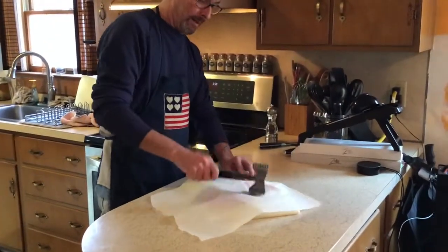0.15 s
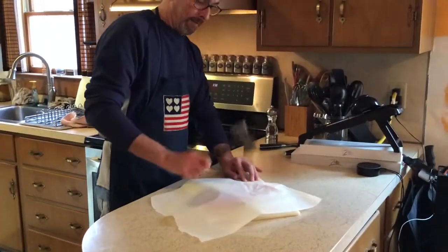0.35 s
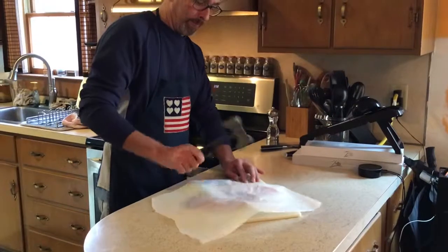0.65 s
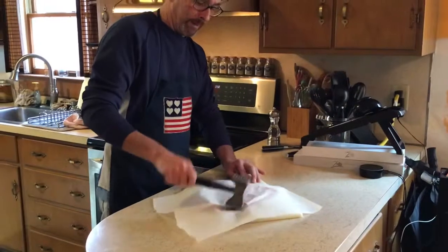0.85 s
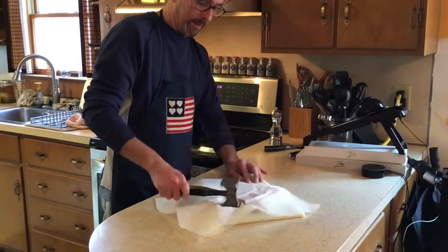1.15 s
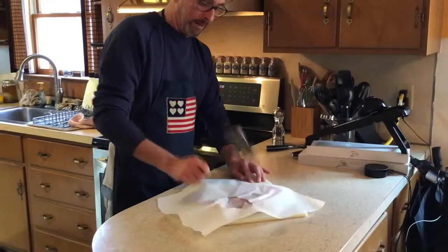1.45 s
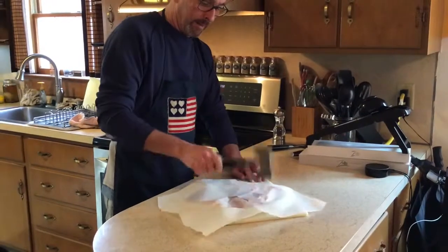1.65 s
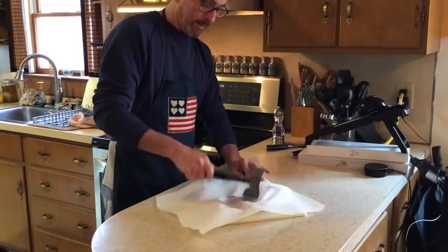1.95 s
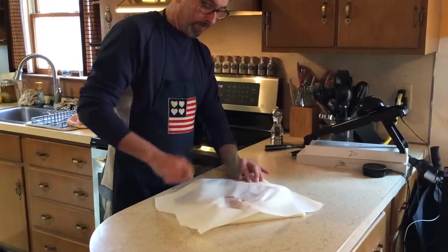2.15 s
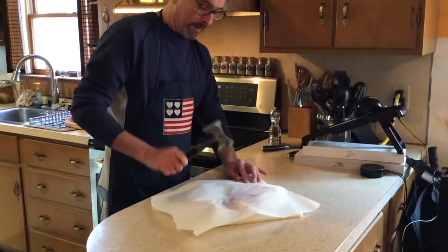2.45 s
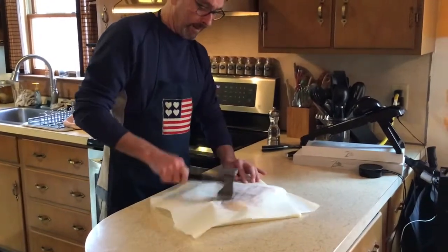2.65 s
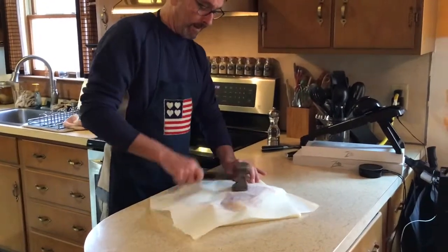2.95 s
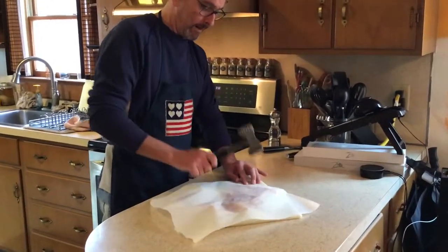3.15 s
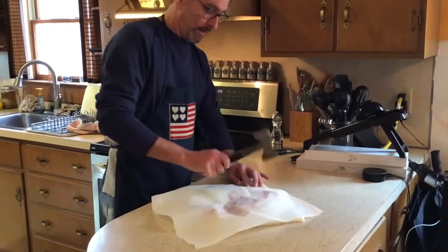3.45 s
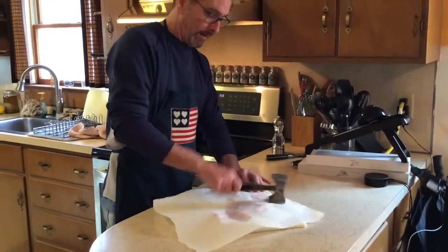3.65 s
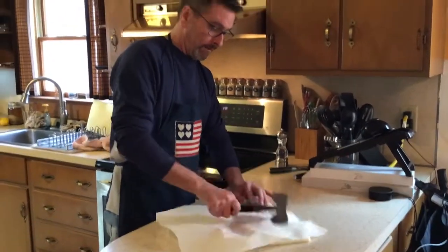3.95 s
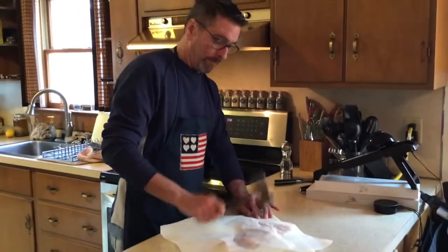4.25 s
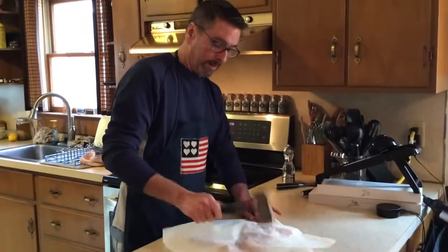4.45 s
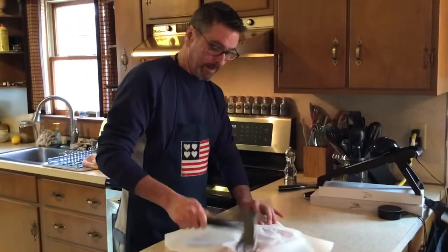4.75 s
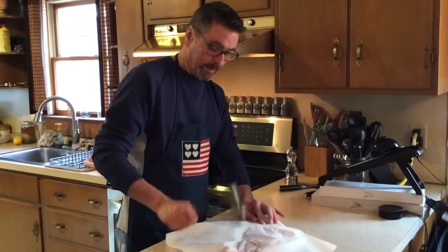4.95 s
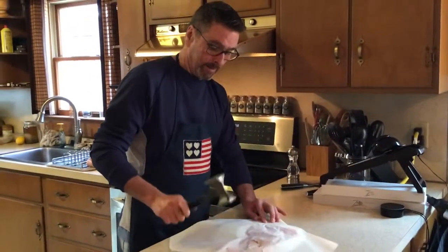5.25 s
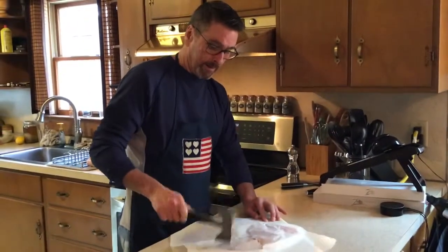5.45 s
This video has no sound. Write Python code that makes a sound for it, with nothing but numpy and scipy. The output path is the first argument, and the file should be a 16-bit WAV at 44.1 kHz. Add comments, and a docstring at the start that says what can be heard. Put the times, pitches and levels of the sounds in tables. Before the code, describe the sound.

Steady heavy blows smack damp meat through paper, knocking and booming the countertop in a small hard-surfaced kitchen.

```python
"""A metal mallet pounds a chicken breast under paper on a counter, in a small hard kitchen.
A faint rumble and hiss, steady filtered noise, runs throughout; the first blow is already dying away.
Then come about three blows a second. Each slaps the paper (a stream of snaps), squeezes the wet meat
with a smack (snaps and one crack, coloured by trapped air) and, as the meat bottoms out, knocks the
worktop and booms the hollow counter (struck modes). From one second on, the paper crinkles at times."""
import sys
import numpy as np
from scipy import signal
from scipy.fft import rfft, irfft, next_fast_len
from scipy.io import wavfile
from scipy.ndimage import uniform_filter1d

SR = 44100
rng = np.random.default_rng(int(sys.argv[2]) if len(sys.argv) > 2 else 0)


def master_out(mix):
    """Clip the mix to full scale and print it as 16-bit PCM to the path in sys.argv[1]."""
    frames = np.transpose(np.atleast_2d(mix))
    ceiling = np.clip(frames, -1, 1)
    pcm = np.round(ceiling * 32767).astype(np.int16)
    wavfile.write(sys.argv[1], SR, pcm)


N = 247401   # samples in the scene
SIZE = 18000   # samples in one burst
AGE = np.arange(SIZE) / SR   # time since a touch [s]


def from_db(db):
    """Level: an amplitude gain grows tenfold every 20 dB."""
    return 10 ** (np.asarray(db) / 20)


def at_hz(points, hz):
    """Spectral interpolation: a table is read along a logarithmic frequency axis."""
    table = np.array(points)
    return np.interp(np.log(np.maximum(hz, 1)), np.log(table[:, 0]), table[:, 1])


def at_level(x, db):
    """Short-time level: a burst is scaled to this rms level over its first twentieth of a second."""
    rms = np.sqrt(np.mean(x[:SR // 20] ** 2) + 1e-20)
    return from_db(db) * x / rms


def add(out, s, x):
    """Superposition: x is summed into out from time s on."""
    start = round(s * SR)
    first, last = max(start, 0), min(start + len(x), len(out))
    out[first:last] += x[first - start:last - start]


def through(x, response):
    """Linear system: the output is the burst convolved with the impulse response."""
    return signal.fftconvolve(x, response)[:SIZE]


def coloured(x, spectrum):
    """Minimum phase: the Hilbert transform of the log gain makes the filter causal."""
    size = next_fast_len(len(x))
    hz = np.abs(np.fft.fftfreq(size, 1 / SR))
    log_gain = np.log(from_db(at_hz(spectrum, hz)))
    response = np.exp(np.conj(signal.hilbert(log_gain)))[:size // 2 + 1]
    return irfft(rfft(x, size) * response, size)[:len(x)]


def resonant(x, hz, q, boost_db):
    """Resonance: a narrow band about the natural frequency is lifted."""
    peak = signal.lfilter(*signal.iirpeak(hz, q, fs=SR), x)
    return x + (from_db(boost_db) - 1) * peak


def push(squash_s, soft_s):
    """Impulse: the force on the counter is one rounded pulse of unit sum as the meat bottoms out."""
    force = np.exp(-.5 * ((AGE - squash_s) / soft_s) ** 2)
    return force / force.sum()


def ring(modes, scatter_db):
    """Modal superposition: neighbours swing oppositely; their strengths vary with the spot hit."""
    out = 0
    for k, (hz, db, t60) in enumerate(modes):
        level_db = db + scatter_db * rng.standard_normal() - 60 * AGE / t60
        out = out + (-1) ** k * from_db(level_db) * np.sin(2 * np.pi * hz * AGE)
    return out


def crackle(per_s, spread_db):
    """Random impulse process: tiny snaps of uneven size and either sign come at chance moments."""
    size_db = spread_db * np.minimum(rng.exponential(1, SIZE), 3)
    sizes = from_db(size_db) * rng.choice([-1, 1], SIZE)
    return sizes * (rng.random(SIZE) < per_s / SR)


def linger(power, t60):
    """Exponential decay: sound energy is stored and dies away by 60 dB in t60."""
    kept = from_db(-60 / (t60 * SR)) ** 2   # energy kept per sample
    return signal.lfilter([1], [1, -kept], power + 1e-18)


# kitchen reverberation: (frequency [Hz], t60 [s])
REVERBERATION = [(150, 0.47), (500, 0.37), (1500, .39), (5000, 0.35), (8000, 0.27), (11000, 0.26),
                 (16000, 0.21)]
BAND_EDGES = np.geomspace(35, 18000, 15)   # [Hz]
# bands of the diffuse sound: (centre frequency [Hz], band-pass filter)
BANDS = [(np.sqrt(low * high), signal.butter(2, [low, high], "band", fs=SR, output="sos"))
         for low, high in zip(BAND_EDGES, BAND_EDGES[1:])]


def kitchen(envelope, near_db, near_t60):
    """Diffuse field: a quick scatter off the counter, then a tail dying sooner in the treble; energy 1."""
    power, out = envelope ** 2, 0
    near = from_db(near_db) ** 2 * linger(power, near_t60)
    white = rng.standard_normal((2, SIZE))
    for k, (hz, sos) in enumerate(BANDS):
        band = signal.sosfilt(sos, white[k % 2])
        # each band is divided by its own short-time level, so it stays steady
        band = band / np.sqrt(uniform_filter1d(band ** 2, size=2500) + 1e-12)
        tail = linger(power, at_hz(REVERBERATION, hz))
        out = out + band * np.sqrt(hz * (near + tail))   # equal power per Hz
    return out / np.linalg.norm(out)


def flutter(x, echo_db, count):
    """Comb interference: bounces off cupboard doors, on paths that vary, ripple the spectrum."""
    out = x.copy()
    for delay_s in rng.uniform(.002, .03, count):
        add(out, delay_s, from_db(echo_db) * x)
    return out


def snaps_in_kitchen(envelope, per_s, spread_db, direct_db, near_db, near_t60):
    """Direct and diffuse fields: snaps from many spots reach the microphone directly and as a wash."""
    snaps = crackle(per_s, spread_db) * envelope
    direct = from_db(direct_db) * snaps / (np.linalg.norm(snaps) + 1e-12)
    heard = direct + kitchen(envelope, near_db, near_t60)
    return flutter(heard, echo_db=-18, count=7)


# spectrum of the room's noise: (frequency [Hz], relative level per Hz [dB])
ROOM_SPECTRUM = [(20, -28.5), (45, -8.5), (80, -4.5), (170, -6.5), (330, -16.5), (600, -20), (1500, -26),
                 (4500, -30), (8000, -40.5), (16000, -63)]


def room_tone():
    """Stationary noise: filtered random noise makes the kitchen's faint steady rumble and hiss."""
    noise = coloured(rng.standard_normal(N), ROOM_SPECTRUM)
    return from_db(-58) * noise / noise.std()


# spectrum of the slapped paper: (frequency [Hz], relative level per Hz [dB])
PAPER_SPECTRUM = [(300, -16.5), (1200, 2), (2500, -1), (4300, 3.5), (6000, 0), (8500, -2), (11000, -6.5),
                  (16000, -10.5)]


def paper_slap(squash_s, hold, release_s):
    """Crackle noise: the paper snaps from first touch while the mallet face presses it flat."""
    pressed = np.exp(-np.maximum(AGE - hold * squash_s, 0) / release_s)
    snaps = snaps_in_kitchen(pressed, per_s=6500, spread_db=4, direct_db=1.0, near_db=8.0, near_t60=0.03)
    return coloured(snaps, PAPER_SPECTRUM)


# spectrum of the wet smack: (frequency [Hz], relative level per Hz [dB])
SMACK_SPECTRUM = [(150, -21.5), (400, 1.5), (650, -0.5), (900, -1.5), (1400, -4), (2100, -4), (2800, -7.5),
                  (4200, -11.5), (7000, -23.5), (16000, -34.5)]


def meat_smack(squash_s, pockets, crest, rise_s, release_s):
    """Cavity resonance: juice and air burst out under pressure, coloured by air pockets under the face."""
    late = AGE - crest * squash_s
    pressure = np.exp(np.minimum(late / rise_s, -late / release_s))
    squelch = snaps_in_kitchen(pressure, per_s=4500, spread_db=3.0, direct_db=-1.0,
                               near_db=9.5, near_t60=0.034)
    # the trapped air breaks out with one sharp crack
    pop = np.diff(push(.55 * squash_s, soft_s=2 / SR), prepend=0)
    burst = coloured(squelch + from_db(-12.5) * pop / np.linalg.norm(pop), SMACK_SPECTRUM)
    for hz, lift_db in pockets:
        hollow = resonant(burst, hz, q=5.3, boost_db=lift_db) - burst
        # the hollow colour is strong at first and fades, leaving a smooth tail
        burst = burst + hollow * np.exp(-AGE / 0.051)
    return burst


# worktop modes: (frequency [Hz], relative level [dB], t60 [s])
WORKTOP_MODES = [(270, -2.5, .08), (344.6, -8.5, 0.071), (376, -6.5, .14), (467, -15.5, 0.044),
                 (565, -8.5, 0.058), (647.6, -4, 0.081), (1113, -0.5, 0.052), (1455, -5, 0.046),
                 (2050, -4.5, 0.029)]
# spectrum of the knock as it fills the room: (frequency [Hz], relative level per Hz [dB])
KNOCK_SPECTRUM = [(100, -19.5), (200, -1), (300, 3.5), (400, -2), (500, -15), (650, -4.5), (1200, -25),
                  (4000, -80)]
# standing waves of the kitchen: (frequency [Hz], relative level [dB], t60 [s])
ROOM_MODES = [(91.7, -4.5, 0.33), (148, -9.5, 0.7), (228.8, 0, 0.48), (318, -3, .42), (382.5, 6.5, 0.28),
              (446, -0.5, 0.32), (558, -6, 0.26), (680, -6, 0.35)]


def worktop_knock(squash_s, wash_db, standing_db):
    """Modal coupling: the stiff worktop's short knock spreads out and wakes the room's standing waves."""
    force = push(squash_s, soft_s=0.000067)
    knock = through(force, ring(WORKTOP_MODES, scatter_db=3.0))
    wash = coloured(kitchen(force, near_db=8.0, near_t60=0.032), KNOCK_SPECTRUM)
    build_up = 1 - np.exp(-AGE / 0.011)   # standing waves take time to build
    standing = through(force, ring(ROOM_MODES, scatter_db=5.5) * build_up)
    return at_level(knock, 0) + at_level(wash, wash_db) + at_level(standing, standing_db)


# counter and cabinet modes: (frequency [Hz], relative level [dB], t60 [s])
COUNTER_MODES = [(50.4, -36, 0.35), (72, -24.5, 0.26), (96.95, -19.5, 0.34), (111.8, -24, 0.23),
                 (158.6, -15, 0.23), (176.5, -28.5, 0.18), (222.4, -19, 0.2), (315, -10.5, 0.012)]
# first echoes of the boom from floor and cupboards: (delay [s], level [dB])
BOOM_ECHOES = [(0.011, -2.5), (0.0156, -3.3)]
# spectrum of the boom as it fills the room: (frequency [Hz], relative level per Hz [dB])
BOOM_SPECTRUM = [(30, -16), (60, 0), (90, 3), (130, -9.5), (170, 1.5), (300, -15), (800, -48.5),
                 (3000, -82)]


def counter_boom(force, room_db):
    """Early reflection: the hollow counter's low ring is thrown back nearby and held by the room."""
    boom = through(force, ring(COUNTER_MODES, scatter_db=0.5))
    echoes = sum(from_db(db) * np.interp(AGE - delay, AGE, boom, left=0) for delay, db in BOOM_ECHOES)
    wash = coloured(kitchen(force, near_db=3.5, near_t60=.06), BOOM_SPECTRUM)
    return boom + echoes + at_level(wash, room_db)


# blows of the mallet: (first touch [s], time until the meat bottoms out [s], force [dB],
#   thud gain [dB], paper slap level [dB], resonance of the big pocket of trapped air [Hz])
MALLET_BLOWS = [(-0.19, 0.0068, 2.5, 1, -30, 640), (0.1661, 0.0067, 2.5, 3.5, -27, 650),
                (0.5, 0.0088, 1, 3.5, -22.5, 643), (0.8503, 0.0096, -10.5, 0.5, -24, 640),
                (1.2235, 0.0073, 2.5, -2, -24.5, 1100), (1.6011, 0.008, 1.5, 3.5, -28.5, 910),
                (1.937, .0069, 2.5, 4.5, -25, 820), (2.2733, .0074, 2, -1, -27.5, 743),
                (2.6435, 0.0079, 5, 0, -25.5, 620), (2.9686, 0.008, -2, 1.5, -26.5, 930),
                (3.3205, .0074, -6, 0, -26.5, 640), (3.68, .0086, 2.5, .5, -28.5, 1110),
                (4.0129, .0059, 6, 3, -28.5, 1174), (4.3837, .0074, -.5, 2, -27.5, 1120),
                (4.7446, 0.0091, -3.5, -2, -26.5, 700), (5.0842, .011, -2, 1.5, -24, 1120),
                (5.4234, 0.0085, 0, -1, -25.5, 860)]
# levels at force 0 dB [dB], and the knock's dB per dB of force
SMACK_DB, KNOCK_DB, KNOCK_PER_DB = -23, -25.5, 0.62
# a harder blow stops more abruptly: softness at force 0 dB [s], force that halves it [dB]
STOP_S, STOP_HALVES_DB = 0.00083, 9
# trapped air: lift of the big pocket [dB], resonance [Hz] and lift [dB] of the small one
BIG_POCKET_DB, SMALL_POCKET_HZ, SMALL_POCKET_DB = 5.0, 1770, 3.5


def pounding():
    """Impact excitation: force sets the smack, the knock and how abruptly the counter is pushed."""
    out = np.zeros(N)
    for s, squash_s, force_db, thud_db, slap_db, pocket_hz in MALLET_BLOWS:
        slap = paper_slap(squash_s, hold=0.84, release_s=0.0044)
        add(out, s, at_level(slap, slap_db))
        pockets = [(pocket_hz, BIG_POCKET_DB), (SMALL_POCKET_HZ, SMALL_POCKET_DB)]
        smack = meat_smack(squash_s, pockets, crest=0.82, rise_s=0.0031, release_s=0.0078)
        add(out, s, at_level(smack, SMACK_DB + force_db))
        knock = worktop_knock(squash_s, wash_db=1.5, standing_db=-6.0)
        add(out, s, at_level(knock, KNOCK_DB + KNOCK_PER_DB * force_db))
        soft_s = STOP_S * 2 ** (-force_db / STOP_HALVES_DB)
        thud = counter_boom(push(squash_s, soft_s), room_db=-36.5)
        add(out, s, from_db(thud_db) * thud)
    return out


# paper crinkling as the mallet lifts: (time [s], length [s], level [dB], pitch [Hz])
PAPER_CRINKLES = [(0.978, .006, -59, 5140), (1.1233, .003, -56, 3600), (3.25, 0.0018, -70.5, 5500),
                  (3.517, 0.0017, -70, 8000), (4.459, 0.027, -38, 6800)]


def paper_crinkles():
    """Stick and release: damp paper unsticks and springs back, each fold with its own pitch."""
    out = np.zeros(N)
    for s, length_s, db, hz in PAPER_CRINKLES:
        swell = AGE / length_s * np.exp(-(AGE / length_s) ** 2)
        snaps = snaps_in_kitchen(swell, per_s=3500, spread_db=2.0, direct_db=3.0,
                                 near_db=-8.0, near_t60=.03)
        # (frequency [Hz], relative level per Hz [dB])
        fold = [(hz / 10, -30), (hz / 2, -9), (hz, 0), (2 * hz, -16), (10 * hz, -50)]
        add(out, s, at_level(coloured(snaps, fold), db))
    return out


def scene():
    """Superposition: blows and paper sum with the quiet of the kitchen."""
    return (room_tone() + pounding() + paper_crinkles())[None]


def record(dry):
    """Band limiting and clipping: a small microphone loses deep bass, the peaks clip, the top is cut."""
    thinned = signal.sosfilt(signal.butter(2, 45, "high", fs=SR, output="sos"), dry)
    clipped = np.clip(thinned, -.95, .95)
    return signal.sosfilt(signal.ellip(10, .1, 90, 16000, fs=SR, output="sos"), clipped)


dry = scene()
out = record(dry)
master_out(out)
```